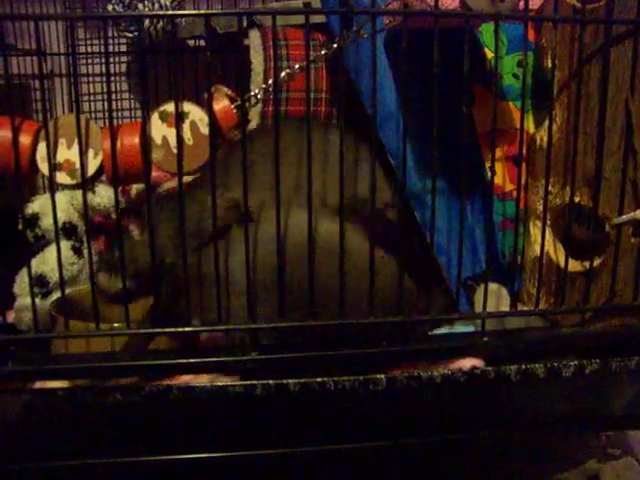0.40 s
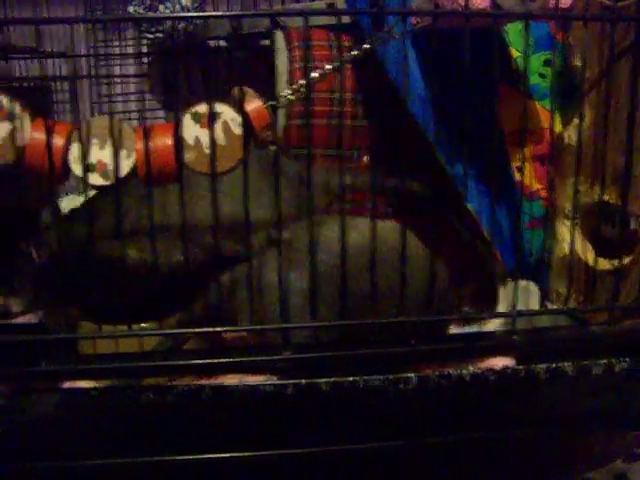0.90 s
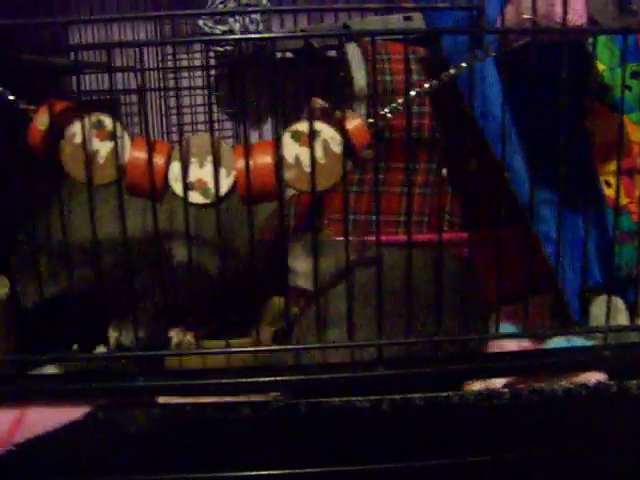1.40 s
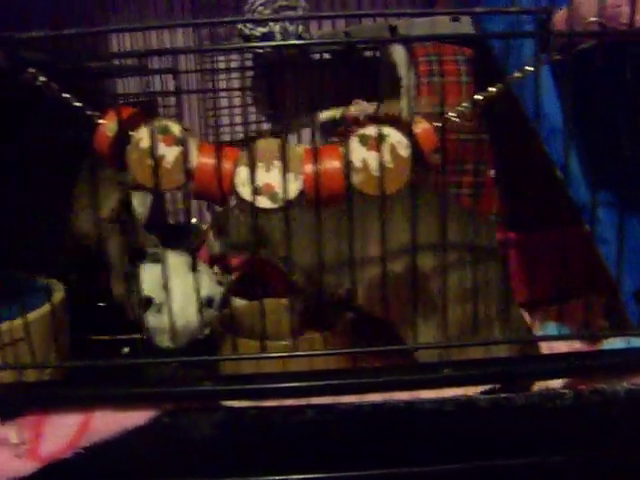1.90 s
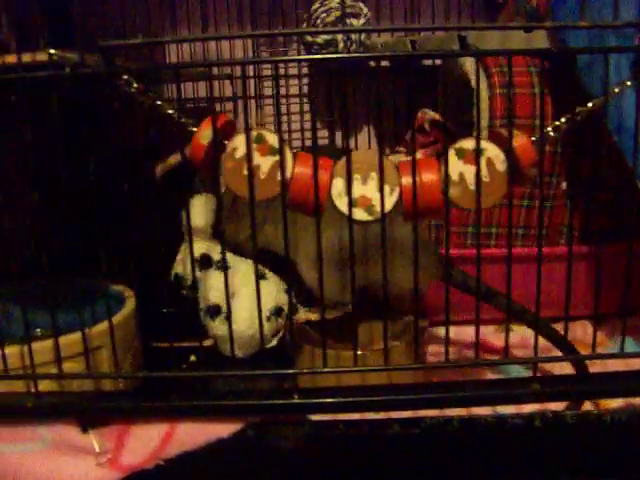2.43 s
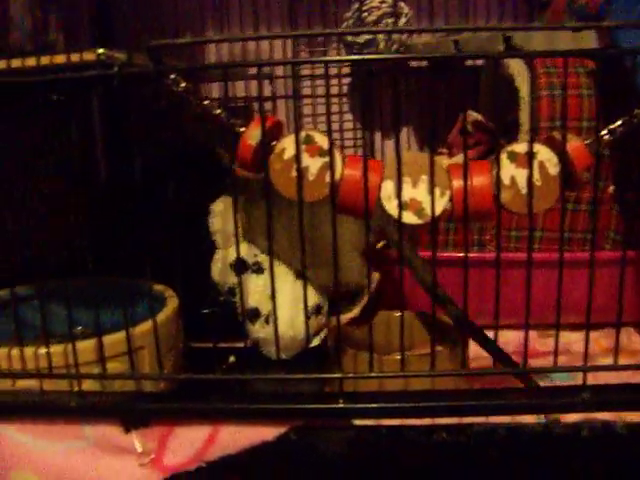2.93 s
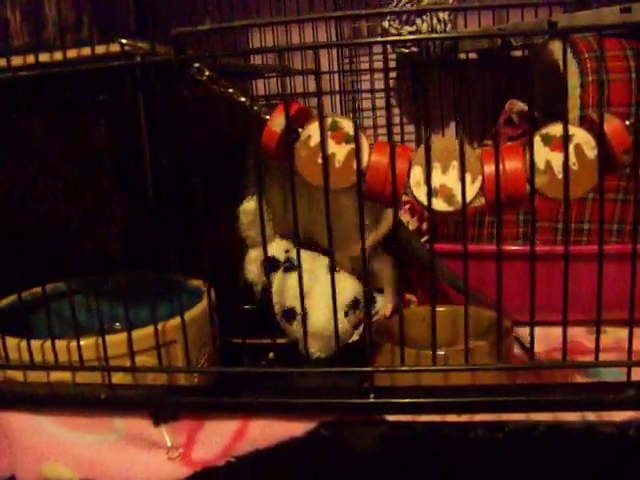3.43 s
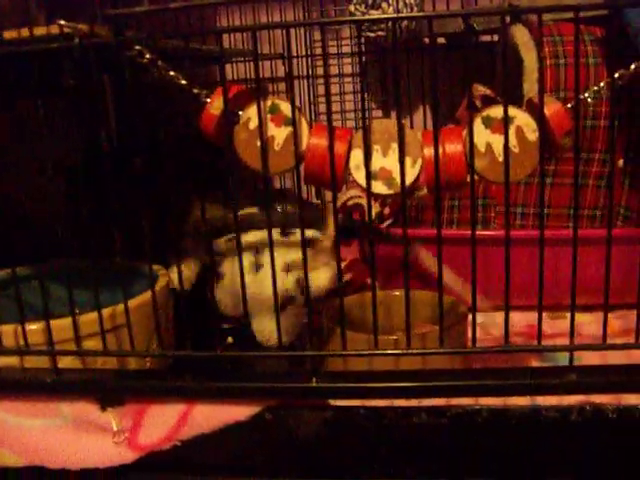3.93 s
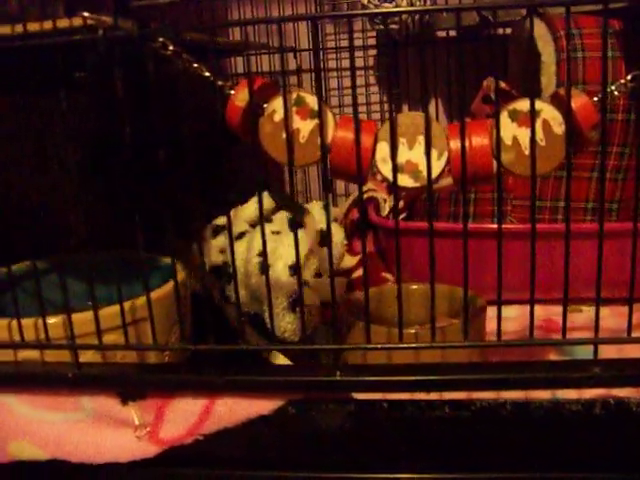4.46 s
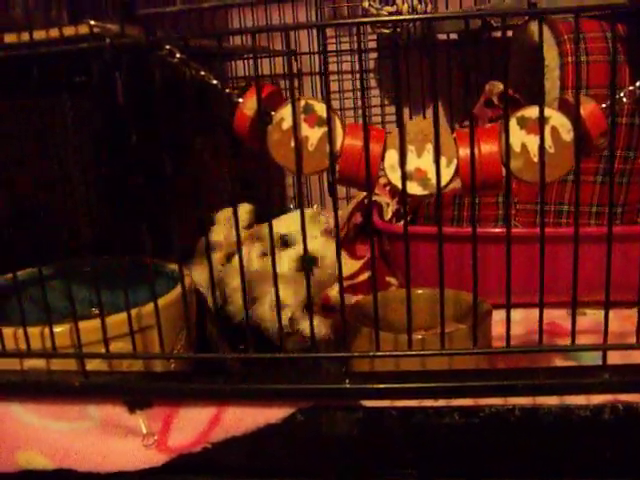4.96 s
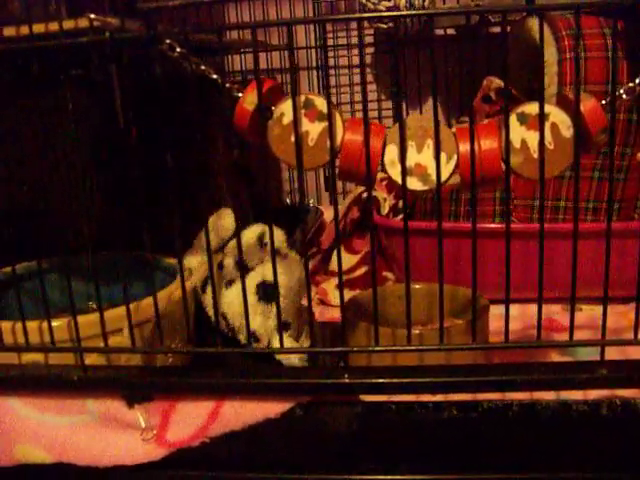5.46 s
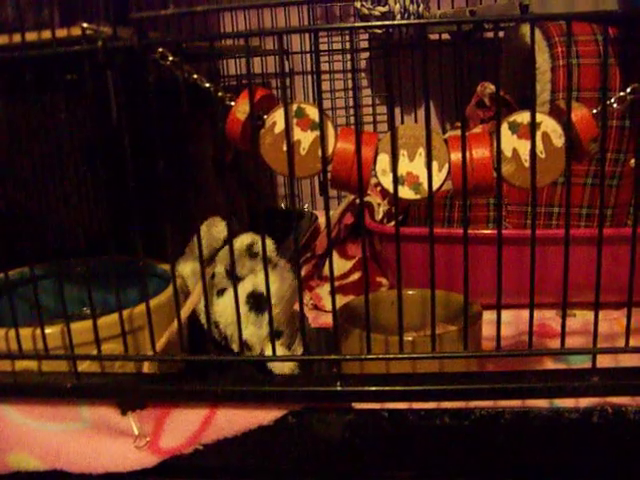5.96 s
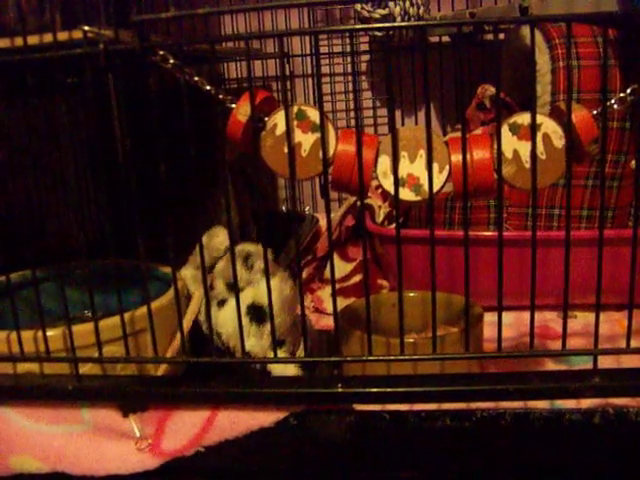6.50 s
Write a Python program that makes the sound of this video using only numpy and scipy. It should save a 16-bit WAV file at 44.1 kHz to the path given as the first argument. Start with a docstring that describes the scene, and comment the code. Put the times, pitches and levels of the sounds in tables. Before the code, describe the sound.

Close to a wire cage in a quiet furnished room, small rodents move about. Soft paw thumps and bedding rustle come with bright, irregular claw ticks and thin chain pings. A wire rattle comes before two seconds, with a faint squeak after it. Dry tooth snaps follow around three seconds, dull dish nudges at four, and a loud hollow clank near five. Only sparse ticks remain, over faint hiss and handling rumble.

```python
"""A quiet room with a wire cage: small rodents move about close to a handheld camera.
Claws tick and paws drum as noise bursts coloured by bars and tray; a hollow dish and teeth snaps ring as
decaying modes; chain links, bars, tray floor and a thin squeak sound as wavering tones.
Bedding rustles as lumpy noise; under it lie microphone hiss and the rumble and bumps of the holding hand."""
import sys
import numpy as np
from scipy import signal
from scipy.fft import rfft, irfft
from scipy.io import wavfile
from scipy.ndimage import uniform_filter1d

SR = 44100
rng = np.random.default_rng(int(sys.argv[2]) if len(sys.argv) > 2 else 0)


def undo_db(level):
    """Turn decibels back into plain size, where 20 dB means ten times bigger."""
    steps = np.asarray(level, float) / 20
    return 10 ** steps


def transcribe(signal):
    """Save signal, clipped to [-1, 1], as a 16-bit WAV file at the path in sys.argv[1]."""
    frames = np.atleast_2d(signal).T
    limited = np.clip(frames, -1, 1)
    pcm = np.round(limited * 32767).astype(np.int16)
    wavfile.write(sys.argv[1], SR, pcm)


N = 291487  # length [samples]


def evened(x):
    """Scales to rms 1."""
    return x / np.sqrt(np.mean(x ** 2) + 1e-20)


def add(mix, start_s, sound):
    """Mixes a sound in at its start time, cut off at the end of the mix."""
    part = mix[round(start_s * SR):][:len(sound)]
    part += sound[:len(part)]


def coloured(points):
    """Steady noise with the spectrum of a table, rms 1."""
    f, db = np.transpose(points)
    hz = np.fft.rfftfreq(N, 1 / SR) + 1
    colour = undo_db(np.interp(np.log(hz), np.log(f), db))
    return evened(irfft(rfft(rng.standard_normal(N)) * colour, N))


def curve(rows, column):
    """One column of a table, drawn as a line over time."""
    table = np.transpose(rows)
    return np.interp(np.arange(N) / SR, table[0], table[column])


def lumps(ms, depth_db):
    """A random level that changes every few milliseconds, rms 1."""
    width = round(ms * SR / 1000)
    drift = uniform_filter1d(uniform_filter1d(rng.standard_normal(N), width), width)
    return evened(undo_db(depth_db * evened(drift)))


def note(db, hz, t60):
    """A single dying tone that wavers as the part swings."""
    t = np.arange(SR // 2) / SR
    waver = 1 + 0.69 * evened(uniform_filter1d(rng.standard_normal(len(t)), 160))
    attack = np.minimum(t / 0.0011, 1)
    return undo_db(db - 60 * t / t60) * waver * np.sin(2 * np.pi * hz * t) * attack


def room(x):
    """A short furnished-room tail of unit energy; its low part dies before its bright part."""
    t = np.arange(SR // 3) / SR
    noise = rng.standard_normal((2, len(t)))
    low = signal.lfilter([.2], [1, -.8], noise[0]) * undo_db(-60 * t / 0.11)
    bright = .5 * noise[1] * undo_db(-60 * t / .25)
    tail = (low + bright) * (t > .004)  # a short gap before the tail
    return signal.fftconvolve(x, tail / np.linalg.norm(tail))[:N]


# spectrum of the microphone hiss: (frequency [Hz], relative level [dB])
HISS_COLOUR = [(30, 6), (250, 0), (400, -2.5), (1000, -7.5), (2000, -7), (4000, -11), (7000, -23.5),
               (9500, -14.5)]


def hiss():
    """Steady microphone noise, heavier in the bass than in the treble."""
    return undo_db(-70) * coloured(HISS_COLOUR)


# how strongly the hand rumbles: (time [s], level [dB])
HAND_LEVEL = [(0.0, -54), (0.16, -55.5), (0.55, -69), (0.73, -70), (3.24, -70.5), (3.74, -70), (3.98, -68),
              (4.75, -73), (5.03, -63.5), (5.39, -74), (5.8, -74), (6.08, -72), (6.22, -71), (6.61, -69.5)]
# spectrum of the rumble: (frequency [Hz], relative level [dB])
RUMBLE_COLOUR = [(25, -29.5), (48, 1.5), (70, -2), (130, 3), (240, -2.5), (400, -30.5)]
# dull bumps against the camera body: (time [s], level [dB], frequency [Hz], length [cycles])
BUMPS = [(0.017, -37, 173, 1.9), (0.095, -44, 144, 2.9), (0.132, -42, 91, 1), (0.222, -45, 79, 1.7),
         (0.271, -42, 114, 1.3), (0.485, -49, 145, 1.3), (1.636, -50.5, 130, 2.4), (1.663, -42, 206, 1.4),
         (1.683, -42, 152, 1), (2.252, -52, 227, 5.9), (3.899, -39, 88.5, 0.35), (4.059, -52, 158.3, 6.4),
         (4.227, -64, 61, 4.9), (4.815, -63.5, 126, 6.9), (6.536, -59.5, 122.7, 7.1)]


def hand():
    """Grip and fingers shake the camera body; each bump is a short low sine under a soft swell."""
    out = undo_db(curve(HAND_LEVEL, column=1)) * coloured(RUMBLE_COLOUR) * lumps(6, depth_db=2.5)
    for s, db, hz, cycles in BUMPS:
        turns = np.arange(0, cycles, hz / SR)
        swell = np.sin(np.pi * np.sqrt(turns / cycles)) ** 2
        add(out, s, undo_db(db) * np.sin(2 * np.pi * turns) * swell)
    return out


# bedding and fur rubbing: (time [s], dull level [dB], bright level [dB])
STIR = [(0.0, -60.5, -64), (.25, -59, -67.5), (.42, -62, -71), (.55, -66, -72.5), (1.07, -68, -72.5),
        (1.25, -68, -68), (1.66, -68.5, -73.5), (2.01, -64.5, -72.5), (2.15, -68, -63), (2.3, -67, -71.5),
        (2.72, -67.5, -68), (3.33, -67, -73), (3.75, -69.5, -70.5), (3.93, -66, -65.5), (4.29, -70, -70.5),
        (4.75, -67, -71), (4.95, -64, -64.5), (5.45, -69.5, -74), (6.61, -69, -72)]
# spectrum of the dull part: (frequency [Hz], relative level [dB])
DULL_COLOUR = [(250, 1), (450, 0), (900, -3.5), (2000, -9), (3500, -21)]
# spectrum of the bright part: (frequency [Hz], relative level [dB])
BRIGHT_COLOUR = [(1500, -37), (3000, -5), (4500, -5.5), (6800, -2.5), (7600, -17), (9000, -30)]


def rustle():
    """Bedding and fur rub as a dull and a bright noise, each swelling in its own small clumps."""
    dull = undo_db(curve(STIR, column=1)) * coloured(DULL_COLOUR) * lumps(29, depth_db=1)
    bright = undo_db(curve(STIR, column=2)) * coloured(BRIGHT_COLOUR) * lumps(15, depth_db=1.5)
    return dull + bright


# one thin squeak: (time [s], length [s], starting level [dB], frequency [Hz], level change by its end [dB])
SQUEAK = (1.835, .25, -65, 1620, -8)


def squeak():
    """A thin sine that throbs unevenly and fades."""
    out = np.zeros(N)
    s, length, db, hz, fade_db = SQUEAK
    t = np.arange(0, length, 1 / SR)
    throb = 1 + .45 * evened(uniform_filter1d(rng.standard_normal(len(t)), 300))
    edges = np.minimum(np.minimum(t, length - t) / .02, 1)
    add(out, s, undo_db(db + fade_db * t / length) * edges * throb * np.sin(2 * np.pi * hz * t))
    return out


# the tray floor booming after a jolt: (time [s], level [dB], t60 [s])
BOOMS = [(2.15, -53.5, 0.4), (4.969, -55.5, 1)]


def tray_booms():
    """The tray floor hums on one low wavering tone as its jolt dies away."""
    out = np.zeros(N)
    for s, db, t60 in BOOMS:
        add(out, s, note(db, 202, t60))
    return out


# chain links pinging: (time [s], level [dB], t60 [s])
LINKS = [(.129, -56, 0.28), (.245, -51, 0.18), (.397, -60, 0.23), (.755, -68, 0.56), (1.266, -58, .23),
         (1.706, -64.5, 0.21), (2.032, -55, .07), (2.163, -52.5, 0.13), (2.391, -54, 0.17),
         (2.84, -61, 0.11), (3.165, -65, .44), (3.86, -63, 0.24), (4.5, -63, 0.27)]


def chain_links():
    """Each link pings on the same high wavering tone."""
    out = np.zeros(N)
    for s, db, t60 in LINKS:
        add(out, s, note(db, 6730, t60))
    return out


# resonances of the cage bars, heard in claws too: (frequency [Hz], width [Hz], relative level [dB])
BAR_MODES = [(2690, 110, -2), (3040, 13.9, 1), (3560, 18, 3), (3995, 110, -2), (4290, 87, -19.5),
             (4780, 12, 2.5), (4840, 51, -17), (5520, 97, -2.5), (5920, 34, -2.5), (6380, 86, -0.5),
             (6900, 27, 3), (6750, 54, -12.5)]
# blows that set all bars ringing: (time [s], level before the mode levels [dB])
BLOWS = [(0.238, -58.5), (1.783, -46.5), (4.945, -58)]


def struck_bars():
    """A blow rings every bar resonance at once, all dying at the same rate."""
    out = np.zeros(N)
    for s, db in BLOWS:
        add(out, s, sum(note(db + d, f, t60=.13) for f, width, d in BAR_MODES))
    return out


# dry snaps of teeth on something hard: (time [s], level before the mode levels [dB])
SNAPS = [(3.0691, -14.5), (3.119, -38.5), (3.205, -32.5), (3.2827, -32.5), (3.2917, -38), (3.3484, -51),
         (3.3935, -35), (3.654, -43), (3.724, -46), (3.902, -51), (4.037, -38), (4.0746, -43.5)]
# what rings in a snap: (frequency [Hz], mean relative level [dB], t60 [s])
SNAP_MODES = [(1700, -19.5, 0.005), (3660, -8.5, 0.0067), (4370, -15, 0.0099), (4750, -5, 0.0053),
              (6300, -13, 0.0055)]


def snaps():
    """A few modes that die within milliseconds, all started at once, balanced afresh each time."""
    t, out = np.arange(2000) / SR, np.zeros(N)
    for s, db in SNAPS:
        ring = np.zeros(len(t))
        for f, d, t60 in SNAP_MODES:
            ring += undo_db(d + 2 * rng.standard_normal() - 60 * t / t60) * np.sin(2 * np.pi * f * t)
        add(out, s, undo_db(db) * ring * np.minimum(t / 0.0009, 1))
    return out


# nudges and knocks on the dish: (time [s], level before the mode levels [dB], contact time [s],
# hardness as treble tilt [dB per octave], factor on the ring times)
KNOCKS = [(3.839, -59, 0.0031, -11.5, 1.1), (4.033, -45.5, 0.007, -26, 1.1),
          (4.048, -44.5, 0.0072, -23, .5), (4.064, -38.5, 0.0074, -20, 1.8), (4.078, -36, 0.017, -17, 0.82),
          (4.121, -62.5, 0.0085, -24.5, 0.3), (4.22, -49, 0.0053, -18.5, 1.14),
          (4.355, -48.5, 0.0079, -19.5, 0.67), (4.938, -11.5, 0.012, -7.5, 0.81),
          (4.954, -13, 0.0082, 2, 0.45), (4.997, -42, .0057, -0.5, 1.24), (5.076, -54.5, 0.0055, 1, .67)]
# modes of the hollow dish: (frequency [Hz], level before the tilt [dB], t60 before the factor [s])
DISH_MODES = [(794.5, 3.5, 0.11), (839, 1, 0.11), (1024, -5, 0.19), (1104, -10.5, 0.076),
              (1174, -13.5, 0.14), (1448, -12.5, 0.15), (1880, -27, 0.058), (2120, -14.5, 0.12),
              (2440, -15, 0.089), (1608, -25.5, 0.11), (247, -37.5, 0.17)]


def dish():
    """A push of finite length rings the dish; hardness lifts its upper modes; the next touch damps it."""
    t, out = np.arange(SR // 2) / SR, np.zeros(N)
    touched_t60 = .04  # extra damping once touched again [s]
    nexts = [row[0] for row in KNOCKS[1:]] + [N / SR]
    for (s, db, contact, tilt_db, free), after in zip(KNOCKS, nexts):
        ring = np.zeros(len(t))
        for f, d, t60 in DISH_MODES:
            mode_db = d + tilt_db * np.log2(f / DISH_MODES[0][0])
            ring += undo_db(mode_db - 60 * t / (free * t60)) * np.sin(2 * np.pi * f * t)
        damped = undo_db(-60 * np.maximum(t - (after - s), 0) / touched_t60)
        push = np.sin(np.pi / 2 * np.minimum(t / contact, 1)) ** 2
        add(out, s, undo_db(db) * ring * damped * push)
    return out


def contacts(rows, modes, octaves, rise, ring_db, skirt_db, low_hz, high_hz):
    """Each contact is a dying burst of noise; the modes of the touched thing stand out, unevenly each time."""
    size = 16384
    t, hz, out = np.arange(size) / SR, np.fft.rfftfreq(size, 1 / SR) + 1, np.zeros(N)
    shapes = np.array([undo_db(db) / np.hypot(1, 2 * (hz - f) / width) for f, width, db in modes])
    band = 1 / (1 + (low_hz / hz) ** 4) / (1 + (hz / high_hz) ** 8)  # what the touched thing can radiate
    for s, db, centre, t60, note_db in rows:
        hump = (np.exp(-.5 * (np.log2(hz / centre) / octaves) ** 2) + undo_db(skirt_db)) * band
        strike = undo_db(ring_db + 4 * rng.standard_normal(len(modes)))
        noise = evened(irfft(rfft(rng.standard_normal(size)) * hump * (1 + strike @ shapes)))
        # the contact scrapes unevenly from one millisecond to the next
        scrape = evened(uniform_filter1d(rng.standard_normal(size), 90))
        noise = noise * evened(undo_db(2 * scrape))
        shape = (1 - np.exp(-t / rise)) * undo_db(-60 * t / t60)
        add(out, s - 2 * rise, .5 * undo_db(db) * noise * shape / shape.max())
        add(out, s, note(db + note_db, centre, 2.0 * t60))  # the note outlasts the burst
    return out


def faint(db, hz, t60, count):
    """Light touches at random moments, more of them while the bedding stirs."""
    u = rng.random((count, 3))
    busy = np.cumsum(undo_db(curve(STIR, column=2)))
    times = np.interp(u[:, 0], busy / busy[-1], np.arange(N) / SR)
    rows = []
    for s, (_, b, c) in zip(times, u):
        rows.append((max(s, .01), db + 8 * (b - .5), hz * 2 ** (0.42 * (c - .5)), t60, -20))
    return rows


# paws and bodies on the tray: (time [s], nominal level [dB], centre [Hz], t60 of the burst [s],
# note at the centre relative to that level [dB])
PAWS = [(.074, -44.5, 804, 0.18, -12), (.099, -47.5, 407, 0.086, -3), (.216, -48.5, 480, 0.47, -28),
        (.239, -49, 2050, 0.44, -13), (.352, -55.5, 480, 0.21, -4), (.968, -57.5, 483, 0.1, -14),
        (1.03, -38.5, 420, 0.22, -22), (1.074, -44, 498, 0.12, -11.5), (1.328, -57, 750, 0.2, -9),
        (1.396, -51, 439, 0.2, -8.5), (1.398, -48.5, 2287, 0.056, -4.5), (1.432, -58.5, 822, 0.085, 0),
        (1.644, -46.5, 371, 0.13, -7), (1.783, -47.5, 999, 0.067, 4), (1.814, -49, 1700, 0.19, -9),
        (2.089, -58, 852, 0.14, -1), (2.14, -37, 471, 0.073, -6.5), (2.141, -53, 1875, 0.064, 0.5),
        (2.174, -48.5, 485, 0.13, -14), (2.303, -59.5, 786, 0.18, -26), (2.339, -57.5, 775, 0.51, -9.5),
        (2.392, -47.5, 1780, 0.22, -23), (2.622, -55, 785, 0.67, -7.5), (2.656, -50, 1570, 0.2, -26),
        (2.689, -38, 1530, 0.18, -34), (2.72, -41.5, 1300, .2, -34), (2.769, -48.5, 549, 0.18, -19),
        (2.913, -57.5, 400, .1, -16), (2.98, -59, 418, 0.21, -10), (3.074, -49.5, 755, 0.096, -36),
        (3.326, -47.5, 1540, 0.028, -9), (3.449, -52, 1300, 0.12, -25), (3.494, -53, 420, 0.15, -10),
        (3.702, -57, 1170, 0.043, -22), (3.723, -55.5, 880, 0.16, -25), (3.83, -51.5, 793, 0.3, -16.5),
        (3.901, -46.5, 500, 0.077, -10.5), (4.004, -46.5, 438, 0.63, -19.5), (4.311, -53.5, 463, .25, -13),
        (4.355, -53.5, 821, 0.087, -23), (4.702, -57, 1590, .21, -11), (4.729, -54.5, 433, 0.093, -32),
        (4.808, -41.5, 614, 0.14, -15), (4.829, -59, 689, 0.09, -10.5), (4.941, -29, 1020, .2, -31),
        (5.151, -53.5, 2140, .15, -22), (5.508, -59.5, 1180, .15, -11.5), (5.914, -60, 1200, 0.12, -19),
        (5.997, -47.5, 1507, 0.057, -7.5), (6.388, -43.5, 2110, 0.18, -15.5),
        (6.456, -50.5, 2440, 0.18, -15.5)]
# resonances of the plastic tray: (frequency [Hz], width [Hz], relative level [dB])
TRAY_MODES = [(478, 82, 10.5), (1000, 34, -27), (1200, 32, 3), (1720, 32, -4), (2010, 54, -25.5),
              (2250, 290, 5)]
# random light paws: (mean nominal level [dB], middle of the centre range [Hz], t60 of the burst [s])
FAINT_PAWS = (-60, 1000, .12)


def paws():
    """Soft paws and bodies drum the tray: low, broad bursts coloured by the plastic."""
    return contacts(PAWS + faint(*FAINT_PAWS, count=8), TRAY_MODES, octaves=0.98, rise=0.001468,
                    ring_db=-2.5, skirt_db=-11, low_hz=300, high_hz=2660)


# claws and teeth on wire: (time [s], nominal level [dB], centre [Hz], t60 of the burst [s],
# note at the centre relative to that level [dB])
CLAWS = [(.0719, -45.5, 3660, 0.18, -17), (.1088, -54.5, 3220, 0.39, -7.5), (.2391, -49.5, 4000, 0.1, -5.5),
         (.272, -55, 3090, 0.24, -5), (.3513, -52, 5640, 0.13, -27), (.396, -44.5, 6420, 0.13, -20),
         (1.0311, -50, 6050, 0.09, -6), (1.0744, -56, 4020, 0.075, -8), (1.205, -55.5, 5200, 0.21, -16),
         (1.404, -54, 4000, 0.038, 2), (1.406, -58, 5650, 0.042, -1), (1.484, -59, 5000, .05, -16),
         (1.5818, -56.5, 2980, 0.065, -9), (1.643, -49, 4230, 0.12, -17), (1.7525, -53, 6400, 0.15, -15),
         (1.7824, -29.5, 6380, 0.058, -31), (1.812, -40, 5520, 0.1, -25), (1.8937, -49.5, 4770, 0.15, -38),
         (1.9058, -46, 3580, 0.12, -19), (1.954, -47, 3040, 0.057, -16), (2.064, -64, 3900, .08, -14),
         (2.083, -45, 5720, 0.071, -14), (2.126, -55, 4030, 0.053, -9), (2.138, -45, 3520, 0.014, 8),
         (2.167, -49, 6700, 0.045, -20), (2.3491, -57, 4870, 0.2, -18), (2.396, -51, 6600, 0.066, -20),
         (2.585, -44, 6600, 0.11, -20), (2.6579, -51.5, 3950, 0.06, -16),
         (2.6888, -44.5, 6100, 0.13, -10.5), (2.7994, -57, 7030, .052, -18),
         (3.013, -51.5, 6610, 0.034, -24), (3.0715, -43, 4750, 0.027, -32),
         (3.2485, -58.5, 2500, .034, -11), (3.328, -37, 3180, 0.022, -20), (3.3618, -42.5, 3400, 0.019, -5),
         (3.383, -51, 4220, 0.13, -18), (3.4123, -49.5, 3850, 0.06, -19), (3.4487, -46.5, 6200, 0.11, -22),
         (3.5443, -53.5, 6500, 0.067, -25), (3.703, -49.5, 6960, 0.033, -15),
         (3.7258, -46, 3860, 0.021, -20), (3.7448, -53, 6930, 0.068, -20.5),
         (3.8073, -58.5, 2700, .043, -20), (3.8312, -49.5, 2890, 0.039, -27),
         (3.8536, -50, 5050, .2, -24.5), (3.9025, -38.5, 2980, 0.021, -30), (3.997, -52, 3220, 0.085, -12),
         (4.0383, -40, 5140, 0.075, -30.5), (4.0726, -45, 2580, 0.078, -18),
         (4.1123, -46.5, 5760, 0.05, -32), (4.354, -42, 6950, 0.063, -32),
         (4.5174, -43, 6750, 0.077, -40.5), (4.6, -53.5, 4720, 0.22, -11),
         (4.7064, -37.5, 7100, 0.045, -12), (4.804, -48, 3840, 0.092, -15), (4.934, -35.5, 5400, .09, -29),
         (4.9434, -26.5, 6350, 0.12, -17), (4.9517, -23, 3500, 0.06, -24.5),
         (5.075, -46.5, 5920, 0.044, -5.5), (5.145, -36.5, 6200, 0.062, -20),
         (5.1896, -53, 5260, 0.091, -20), (5.912, -61, 5370, .08, -6), (6.0092, -55, 3760, .08, -11),
         (6.122, -52, 6900, 0.051, -7), (6.1903, -45.5, 7360, 0.063, -13.5),
         (6.202, -49.5, 5710, 0.061, -11), (6.3814, -43.5, 2800, 0.15, -14),
         (6.4552, -51.5, 2800, 0.17, -15), (6.5557, -53, 7060, 0.069, -9),
         (6.5994, -54.5, 5840, 0.079, -15)]
# random light claws: (mean nominal level [dB], middle of the centre range [Hz], t60 of the burst [s])
FAINT_CLAWS = (-72, 4500, .07)


def claws():
    """Hard claws and teeth tick on the bars: bright, quick bursts coloured by the wire."""
    return contacts(CLAWS + faint(*FAINT_CLAWS, count=16), BAR_MODES, octaves=0.64, rise=.0009,
                    ring_db=5.0, skirt_db=-6.5, low_hz=1300, high_hz=12400)


def scene():
    """Cage sounds with their room, over rustle, hand and hiss."""
    ringing = squeak() + tray_booms() + chain_links() + struck_bars()
    cage = ringing + snaps() + dish() + paws() + claws()
    background = hiss() + hand() + rustle()
    return (background + cage + undo_db(-23.5) * room(cage))[None]


def top_cut(x):
    """Nothing passes above the cut-off."""
    return signal.sosfilt(signal.butter(12, 8960, fs=SR, output="sos"), x)


# dips of the microphone housing: (frequency [Hz], width [Hz])
HOUSING_DIPS = [(300, 100), (975, 48)]


def record(dry):
    """The microphone cuts the bass, dips at its housing and shelves steeply; the converter adds faint noise."""
    hz = np.fft.rfftfreq(N, 1 / SR) + 1
    shelf = 1 / np.sqrt(1 + (hz / 7450) ** 70) + undo_db(-23.5)
    bass_cut = 1 / np.sqrt(1 + (42 / hz) ** 12)
    response = shelf * bass_cut
    for f, width in HOUSING_DIPS:
        response = response * (1 - 0.57 / (1 + 2j * (hz - f) / width))
    converter_noise = undo_db(-91) * rng.standard_normal(dry.shape)
    mix = irfft(rfft(dry) * response, N) + converter_noise
    return top_cut(mix)


dry = scene()
out = record(dry)
transcribe(out)
```